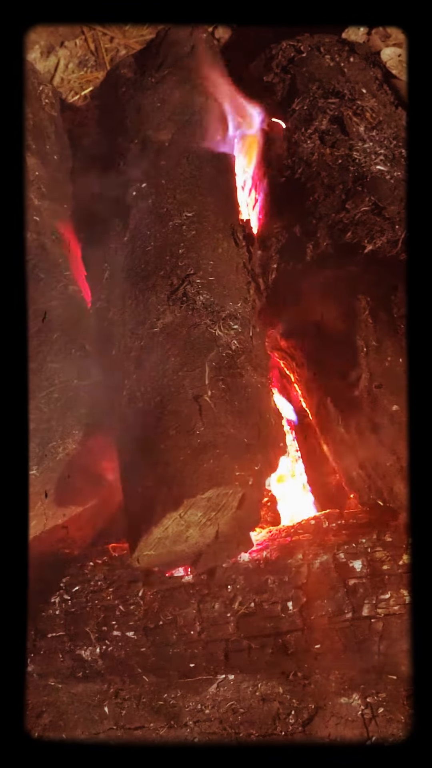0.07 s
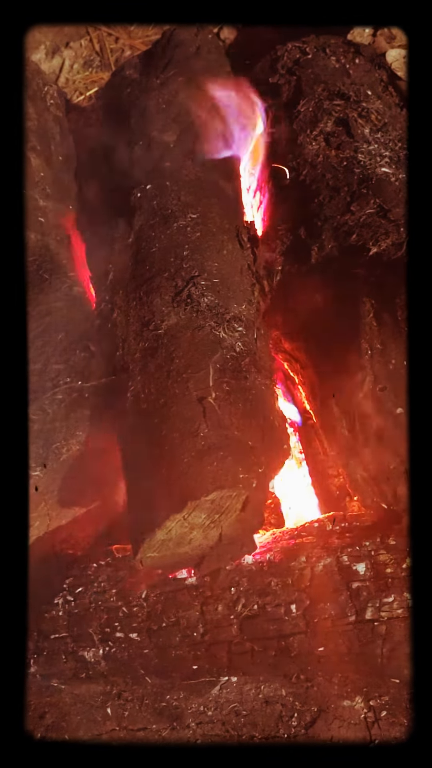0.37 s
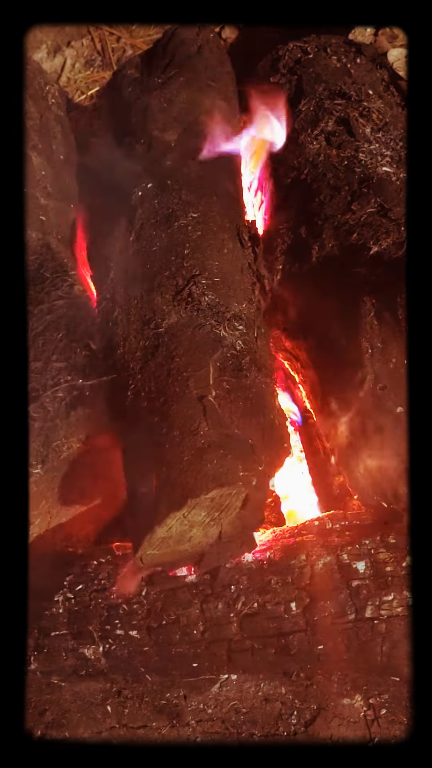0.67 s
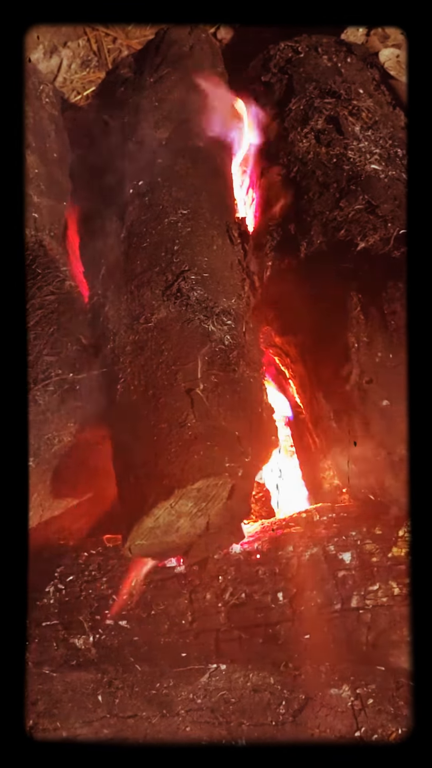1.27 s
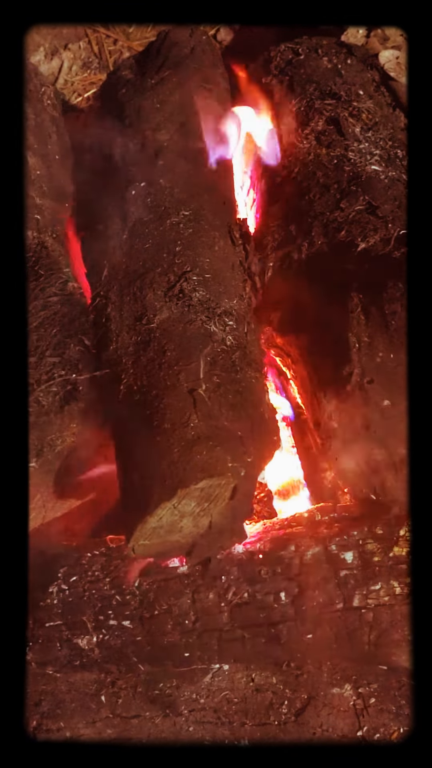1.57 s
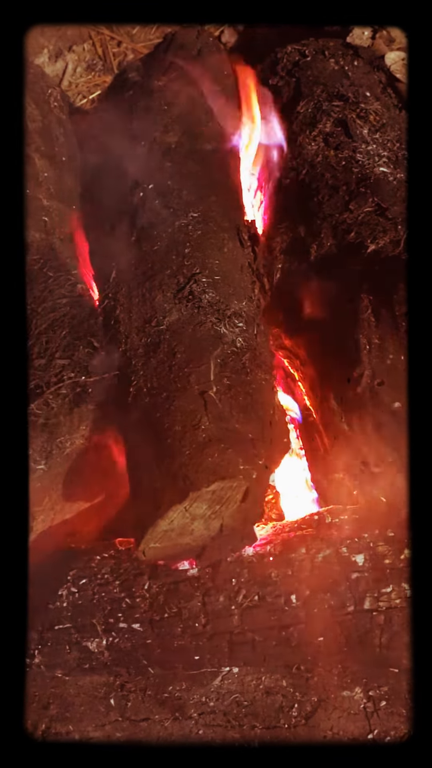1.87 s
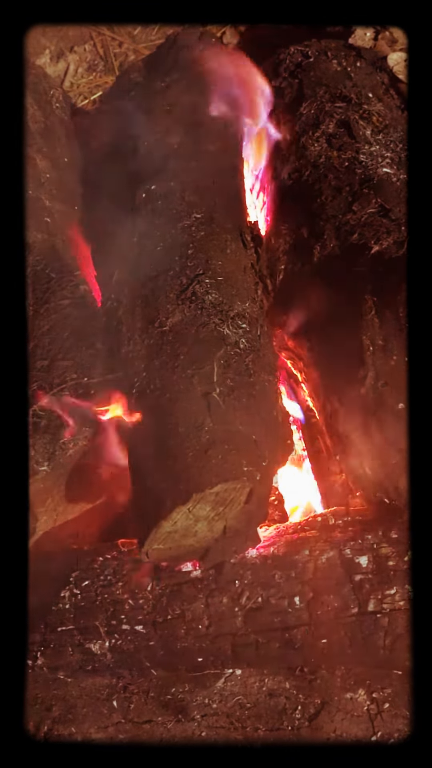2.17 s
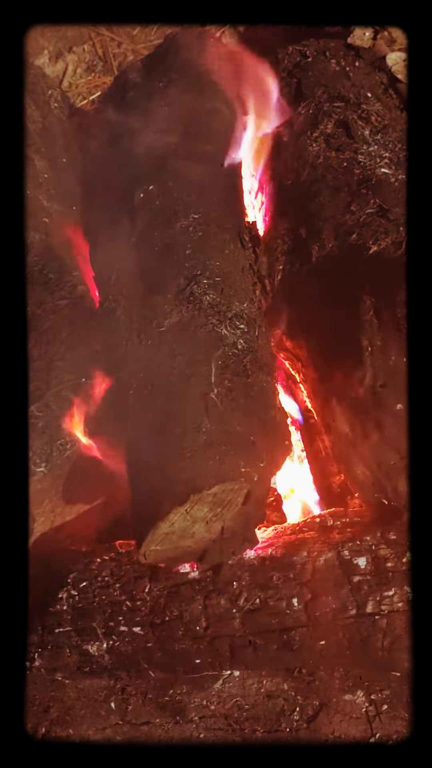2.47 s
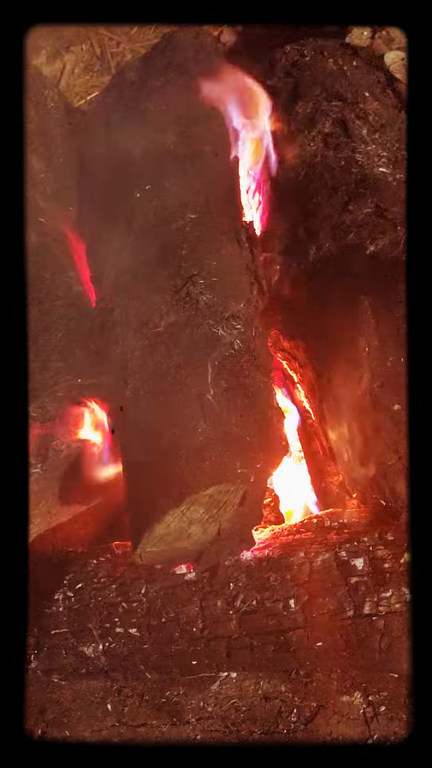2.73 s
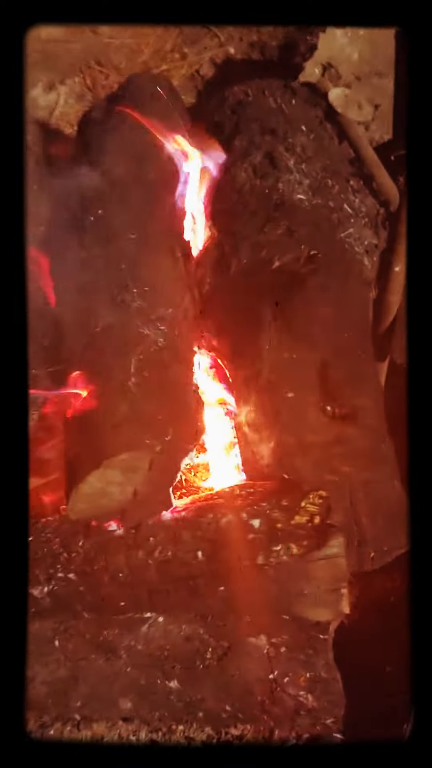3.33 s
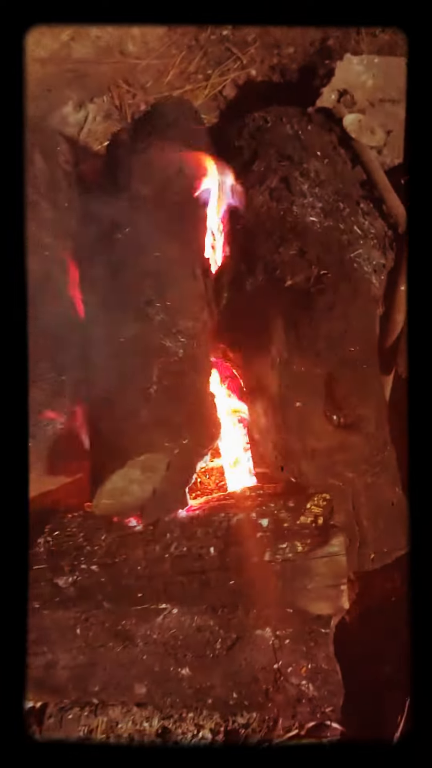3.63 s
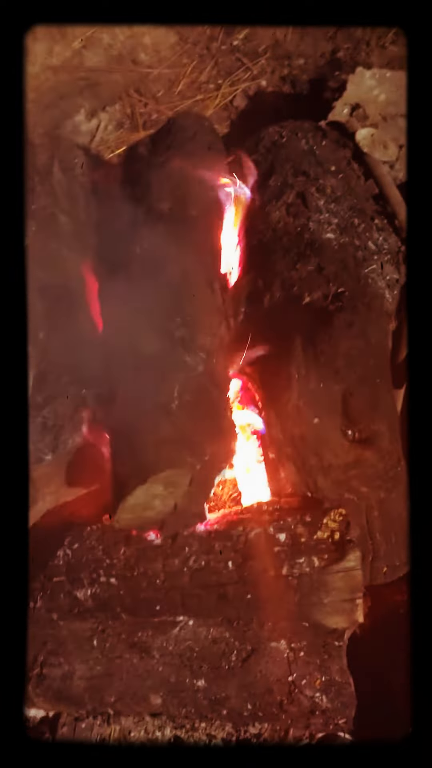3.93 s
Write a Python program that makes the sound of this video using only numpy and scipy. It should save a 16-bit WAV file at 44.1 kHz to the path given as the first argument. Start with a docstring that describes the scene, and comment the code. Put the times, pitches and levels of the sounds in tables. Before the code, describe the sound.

A breeze buffets the microphone in low, uneven thumps beside a small, faintly ticking campfire at night. A frog peeps three times while others cluck far off. The wind drops, the logs snap and a foot scuffs nearby.

```python
"""A small campfire at night. From the start, logs tick and distant frogs cluck over a low outdoor hiss.
From 0.5 s the fire snaps or pops now and then, and a nearer frog whistles three rising peeps.
Breeze eddies buffet both microphone ports from 0.7 s to about 3 s; far frogs trill twice after 2 s.
Snaps cluster near 3.3 s as something rustles close by; a foot scuffs, bumps, lands and slides."""
import sys
import numpy as np
from scipy import signal
from scipy.fft import rfft, irfft, next_fast_len
from scipy.io import wavfile
from scipy.ndimage import uniform_filter1d, map_coordinates

SR = 44100
rng = np.random.default_rng(int(sys.argv[2]) if len(sys.argv) > 2 else 0)


def to_wav(s):
    """Save 16-bit WAV."""
    ch = np.atleast_2d(s).T  # columns
    pcm = np.round(np.clip(ch, -1, 1) * 32767)  # PCM
    wavfile.write(sys.argv[1], SR, pcm.astype(np.int16))


N = 176400

# Log snaps. Each row: start in seconds, then relative body, treble peak and top plateau levels in dB.
SNAPS = [(.4588, -92, -80, -63.5), (2.352, -76, -72, -67), (2.506, -78, -60, -60.5),
         (3.2329, -54.5, -56, -67), (3.256, -87, -57.5, -53.5), (3.281, -79, -60, -50.5),
         (3.2895, -70, -64, -58), (3.3431, -77, -55.5, -60), (3.3524, -55.5, -47, -63),
         (3.4099, -85, -55, -57), (3.717, -81, -56, -65)]
# Body of a snap. Each row: frequency in Hz, gain in dB.
BODY_SPECTRUM = [(400, -8), (1300, -16), (2000, -8.5), (2650, 6.5), (3700, -24.5)]
# Microphone's treble peak and top plateau, colouring both snaps and rustle.
# Each row: frequency in Hz, gain in dB.
MIC_PEAK_SPECTRUM = [(2500, -37), (4500, -4.5), (6000, -5.5), (6900, 10.5), (8600, -7.5), (11500, -30)]
MIC_PLATEAU_SPECTRUM = [(10800, -32), (12200, -6.5), (15800, -9)]
# Dull knocks: two pops in the fire, then a bump of the foot. Each row: start in seconds, level in dB.
KNOCKS = [(0.519, -62.5), (1.7888, -58), (3.661, -57.5)]
# Knock modes. Each row: frequency in Hz, gain in dB, decay in seconds.
KNOCK_MODES = [(263, 3, 0.0082), (514, 0, 0.003)]

# Eddies at the ports. Each row: centre in seconds, level in dB, left minus right in dB, swirl in Hz.
EDDIES = [(0.712, -36.5, -32, 79), (0.808, -38, -15, 70), (0.873, -34.5, 4, 58.5), (1.015, -35, -4, 45.3),
          (1.189, -33.5, 21, 60.4), (1.305, -35, -2, 72), (1.384, -29.5, -1.5, 59.3),
          (1.531, -34, 16, 71.4), (1.602, -28.5, 9, 80.6), (1.636, -33.5, 24, 116.5), (1.762, -29, 1, 61.3),
          (2.053, -29.5, 20, 54), (2.108, -31, 22, 85.4), (2.226, -26.5, 32, 101.6), (2.275, -27.5, 19, 71),
          (2.43, -34.5, 10, 64), (2.61, -27, 16, 74), (2.774, -37.5, 23, 138), (2.799, -29, 20, 86),
          (2.932, -32, 30, 66), (3.049, -35.5, 35, 77)]
# Buffeting per port. Each row: time in seconds, level in dB.
BREEZE_LEFT = [(.15, -82), (.23, -61.5), (.7, -81), (.75, -45.5), (.95, -53), (2.15, -39), (2.55, -45),
               (3.08, -44), (3.28, -73)]
BREEZE_RIGHT = [(.52, -71), (.66, -60), (.7, -41), (.93, -56), (1.8, -46), (2.65, -50.5), (3, -71)]
# Buffeting colour. Each row: frequency in Hz, gain in dB.
BUFFET_SPECTRUM = [(20, -5.5), (48, 3.5), (90, -2.5), (160, -19.5), (230, -31.5), (600, -91)]

# Near frog. Each row: start in seconds, level in dB, left minus right in dB at start and at end.
PEEPS = [(0.538, -61, 7, 40), (1.44, -59, 19, -17), (2.127, -58, 21, -13)]
# Far clucks. Each row: centre in seconds, relative level in dB, middle partial in Hz.
CLUCKS = [(0.155, -71.5, 1500), (0.298, -75, 1227), (1.144, -74.5, 1225), (1.278, -72, 1207),
          (1.529, -74.5, 1244), (1.668, -77.5, 1380), (1.776, -77.5, 1496), (1.894, -79, 1410),
          (2.695, -76.5, 1450), (2.82, -76.5, 1360), (3.055, -70, 1303), (3.35, -68, 1238),
          (3.494, -74, 1306), (3.63, -66, 1286)]
# Far trills. Each row: centre in seconds, half length in seconds, level in dB, pitch in Hz.
TRILLS = [(2.123, 0.12, -74.5, 1240), (2.498, 0.18, -74, 1334)]

# Friction strokes. Each row: time in seconds, level in dB.
RUSTLE_LEVELS = [(3.07, -79), (3.3, -70), (3.33, -78.5), (3.45, -85), (3.604, -87), (3.614, -63),
                 (3.645, -64), (3.745, -72.5), (3.772, -64), (3.8, -77)]
SCUFF_LEVELS = [(3.05, -78), (3.23, -69), (3.4, -77), (3.604, -85), (3.617, -59.5), (3.645, -61.5),
                (3.668, -59.5), (3.72, -64.5), (3.77, -53.5), (3.8, -63), (3.89, -78), (3.935, -60),
                (4, -86.5)]
SLIDE_LEVELS = [(3.76, -104), (3.805, -63), (3.94, -62.5), (4, -68)]
# Sole resonances. Each row: frequency in Hz, width in Hz, gain in dB.
SOLE_MODES = [(283.7, 46, 2), (590, 780, -10), (2500, 540, -20.5), (4220, 980, -21.5), (6580, 1000, -17)]
# Scuffed ground, night hiss, low rumble. Each row: frequency in Hz, gain in dB.
GROUND_SPECTRUM = [(90, -15.5), (330, -7.5), (580, -6), (850, -12), (1300, -9), (2200, -21), (4500, -35)]
HISS_SPECTRUM = [(150, -20), (250, -3), (380, 1.5), (500, -5), (850, -5.5), (1450, -3.5), (2000, -11.5),
                 (2800, -12.5), (4200, -21.5), (6000, -23), (7000, -14.5), (8200, -24), (10900, -36.5),
                 (12300, -12), (15800, -15)]
RUMBLE_SPECTRUM = [(40, -8), (120, -1.5), (190, -8), (500, -40)]
# Stereo likeness of noise. Each row: frequency in Hz, left-right correlation.
CORRELATION = [(250, 0.67), (1300, 0.31), (7000, 0.044)]

TOP_HZ, FAR_FROG_PAN_DB = 15900, -7.5


def fire(tick_count=16, attack_s=0.000075, decay_s=0.00078, tail_s=0.0072, tail_db=-16.5, gain_db=5):
    """Millisecond log snaps, each its own mix of body and microphone-coloured treble, among faint ticks."""
    ticks = [(u * N / SR, *(-74 + 2 * np.array(v))) for u, *v in rng.random((tick_count, 4))]
    envelopes = np.zeros((3, N + SR))
    for start_s, *bands_db in SNAPS + ticks:
        first = max(int(start_s * SR) - SR // 200, 0)
        t = (first + np.arange(SR // 10)) / SR - start_s
        rise = 1 / (1 + np.exp(np.minimum(-t / attack_s, 20)))
        fall = np.exp(-np.maximum(t, 0) / decay_s) + amp(tail_db) * np.exp(-np.abs(t) / tail_s)
        envelopes[:, first:first + len(t)] += amp(bands_db)[:, None] * rise * fall
    bands = [noise(BODY_SPECTRUM), noise(MIC_PEAK_SPECTRUM), noise(MIC_PLATEAU_SPECTRUM)]
    return amp(gain_db) * pan(-11.5) * np.sum(envelopes[:, None, :N] * bands, axis=0)


def knocks():
    """Dull knocks of about two cycles: two pops in the fire, then a bump of the foot."""
    t = clock()[:SR // 10]
    ring = sum(amp(db) * np.sin(2 * np.pi * hz * t) * np.exp(-t / decay_s)
               for hz, db, decay_s in KNOCK_MODES)
    out = np.zeros(N)
    for start_s, db in KNOCKS:
        out[round(start_s * SR):][:len(t)] += amp(db) * ring
    return pan(-3) * out


def breeze(lump_db=4, lumps_per_s=22, width_cycles=0.46):
    """Single eddies thump the ports over weaker, lumpy buffeting."""
    level_db = np.array([curve(BREEZE_LEFT), curve(BREEZE_RIGHT)])
    lumps = amp(lump_db * np.array([wobble(lumps_per_s), wobble(lumps_per_s)]))
    out = amp(level_db) * unit(lumps * noise(BUFFET_SPECTRUM))
    t = clock()[:SR // 2] - 1 / 4
    port_phase_rad = np.array([[0], [np.pi / 2]])
    for centre_s, db, pan_db, hz in EDDIES:
        swirl = np.sin(2 * np.pi * hz * t + port_phase_rad)
        envelope = (1 + (t * hz / width_cycles) ** 2 / 2) ** -2
        first = round((centre_s + t[0]) * SR)
        out[:, first:first + len(t)] += amp(db) * pan(pan_db) * swirl * envelope
    return out


def peeper(length_s=0.11, base_hz=2665, rise_hz=238.4, attack_s=0.014, release_s=0.012, sag_db=14):
    """Near frog: a pure whistle that climbs, fades and shifts in balance, with echo."""
    direct, voice = np.zeros((2, N)), np.zeros(N)
    for start_s, db, start_pan_db, end_pan_db in PEEPS:
        t = clock() - start_s
        progress = np.clip(t / length_s, 0, 1)
        gate = np.clip(t / attack_s, 0, 1) * np.clip((length_s - t) / release_s, 0, 1)
        hz = base_hz + rise_hz * np.sin(np.pi * progress / 2) ** 2 + 6 * wobble(75)
        envelope = amp(db - sag_db * progress + wobble(70)) * gate
        call = envelope * np.sin(2 * np.pi * np.cumsum(hz) / SR)
        direct += call * pan(start_pan_db + (end_pan_db - start_pan_db) * progress)
        voice += call
    return direct + amp(-9.5) * tree_echo(voice)


def footstep():
    """Dry rustle, gritty scuff, then the sole sliding through its resonances."""
    sole = shaped_noise(lambda f: sum(amp(db) / (1 + (2 * (f - hz) / width_hz) ** 2)
                                      for hz, width_hz, db in SOLE_MODES))
    treble = noise(MIC_PEAK_SPECTRUM) + noise(MIC_PLATEAU_SPECTRUM)
    rustle = friction(RUSTLE_LEVELS, treble, grain_db=2.5, grains_per_s=600, pan_db=-8.5)
    ground = contact_resonances(noise(GROUND_SPECTRUM), depth_db=4)
    scuff = friction(SCUFF_LEVELS, ground, grain_db=2.5, grains_per_s=270, pan_db=-8)
    slide = friction(SLIDE_LEVELS, sole, grain_db=2, grains_per_s=100, pan_db=-4)
    return rustle + scuff + slide


def friction(levels, sound, grain_db, grains_per_s, pan_db):
    """Rubbing: sound broken into grains under the level of the stroke."""
    lead_in_db = 60 * np.minimum(clock() - levels[0][0], 0)
    grains = unit(amp(grain_db * wobble(grains_per_s)) * sound)
    return amp(curve(levels) + lead_in_db) * grains * pan(pan_db)


def contact_resonances(x, depth_db):
    """Brief resonances come and go as the contact changes."""
    spectra = signal.stft(x, nperseg=1024)[2]
    patches = uniform_filter1d(rng.standard_normal(spectra.shape[1:]), size=3, axis=0)
    patches = uniform_filter1d(patches, size=4, axis=1)
    return signal.istft(spectra * amp(depth_db * unit(patches)), nperseg=1024)[1][:, :N]


def thud(centre_s=3.782, pitch_hz=64, level_db=-57):
    """One low push through the ground as the foot takes the weight."""
    cycles = (clock() - centre_s) * pitch_hz
    return amp(level_db) * np.sin(2 * np.pi * cycles) * np.exp(-2 * cycles ** 2)


def clucks(faint_count=40, pulse_hz=274.5, throat_hz=1326.5, half_width_hz=176, sag_hz_per_s=1900,
           half_length_s=0.0073, gain_db=8.5):
    """Far frogs: short pulsed calls through a throat resonance; fainter ones overlap at random."""
    faint = [(u * N / SR, -83.5 + 6 * v, throat_hz + 500 * (w - 0.5))
             for u, v, w in rng.random((faint_count, 3))]
    out, t = np.zeros(N + SR), clock()[:SR // 10] - 1 / 20
    for centre_s, db, hz in CLUCKS + faint:
        partials_hz = hz + np.arange(-2, 3)[:, None] * pulse_hz * rng.normal(1, 0.07)
        gains = 1 / (1 + ((partials_hz - (throat_hz + hz) / 2) / half_width_hz) ** 2)
        cycles = partials_hz * t - sag_hz_per_s * t * t / 2 + rng.random(gains.shape)
        tone = unit(np.sum(gains * np.sin(2 * np.pi * cycles), axis=0))
        envelope = np.exp(-(t / half_length_s / rng.lognormal(0, 0.41)) ** 2)
        out[round(centre_s * SR):][:len(t)] += amp(db + gain_db) * tone * envelope
    out = out[SR // 20:][:N]  # centre each call on its time
    return pan(FAR_FROG_PAN_DB) * (out + amp(-22.5) * tree_echo(out))


def trills(pulse_hz=70.5, width_hz=350):
    """Far frogs: fast pulse trains of throat-band noise."""
    out = 0
    for centre_s, half_length_s, db, hz in TRILLS:
        t = clock() - centre_s
        pulses = unit(np.cos(np.pi * pulse_hz * t + wobble(8.3) / 2) ** 2)
        throat = shaped_noise(lambda f: (1 + ((f - hz) / width_hz) ** 2) ** -2)
        out = out + amp(db) * np.exp(-(t / half_length_s) ** 2) * pulses * throat
    return pan(FAR_FROG_PAN_DB) * out


def tree_echo(x, t60_s=0.6):
    """Diffuse echo from the trees."""
    tail = rng.standard_normal((2, SR)) * amp(-60 * clock()[:SR] / t60_s)
    return signal.fftconvolve(x[None], tail / np.linalg.norm(tail[0]), axes=1)[:, :N]


def night(hiss_db=-74, rumble_db=-75.5):
    """Steady outdoor hiss and a low rumble."""
    return amp(hiss_db) * pan(-4) * noise(HISS_SPECTRUM) + amp(rumble_db) * noise(RUMBLE_SPECTRUM)


def noise(spectrum):
    """Stereo noise from (Hz, dB) points."""
    return shaped_noise(lambda hz: amp(log_interp(spectrum, hz)))


def shaped_noise(response):
    """Stereo noise, rms 1: channels alike in the lows, unrelated in the treble."""
    def mid_side_gains(hz):
        angle = np.arccos(np.clip(log_interp(CORRELATION, hz), -1, 1)) / 2
        return response(hz) * (hz < TOP_HZ) * np.array([np.cos(angle), np.sin(angle)])
    mid, side = filtered(rng.standard_normal((2, N)), mid_side_gains)
    return unit(np.array([mid + side, mid - side]))


def filtered(x, response):
    """Zero-phase filter; response maps Hz to gain."""
    size = next_fast_len(N + SR // 2)
    return irfft(rfft(x, size) * response(np.fft.rfftfreq(size, 1 / SR)), size)[..., :N]


def wobble(knots_per_s):
    """Smooth random curve."""
    knots = rng.standard_normal(4096)
    coarse_s = clock()[::10]
    return np.interp(clock(), coarse_s, map_coordinates(knots, [coarse_s * knots_per_s], mode="wrap"))


def pan(db):
    """Constant-power gains; db is left minus right."""
    gains = np.array([amp(db / 2), amp(-db / 2)]).reshape(2, -1)
    return gains / np.sqrt(np.mean(gains ** 2, axis=0))


def log_interp(points, hz):
    """(Hz, value) points on a log axis."""
    knots_hz, values = np.transpose(points)
    return np.interp(np.log(hz + 1), np.log(knots_hz + 1), values)


def curve(points):
    """(s, value) points to one value per sample."""
    return np.interp(clock(), *np.transpose(points))


def clock():
    """Sample times in seconds."""
    return np.arange(N) / SR


def amp(db):
    """Decibels to gain."""
    return 10 ** (np.asarray(db) / 20)


def unit(x):
    """Scale to rms 1."""
    return x / np.sqrt(np.mean(x ** 2) + 1e-20)


def scene():
    """Sum of all sources, stereo."""
    return breeze() + night() + peeper() + clucks() + trills() + fire() + knocks() + footstep() + thud()


def record(dry):
    """Band limit at TOP_HZ."""
    return filtered(dry, lambda hz: hz < TOP_HZ)


dry = scene()
out = record(dry)
to_wav(out)
```